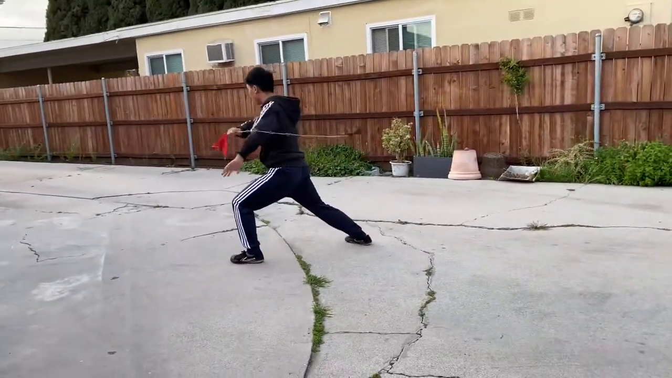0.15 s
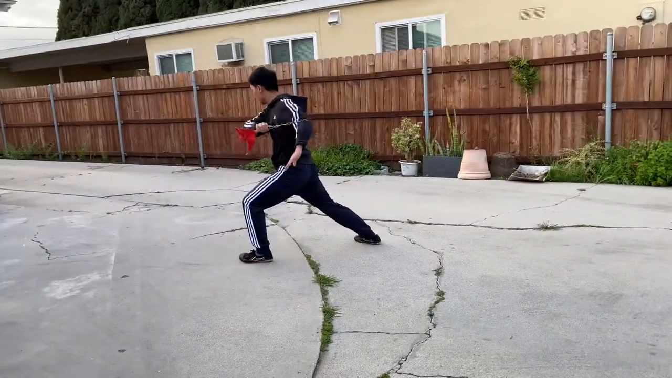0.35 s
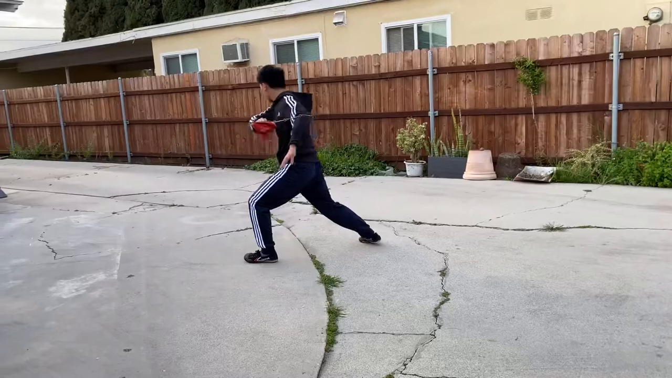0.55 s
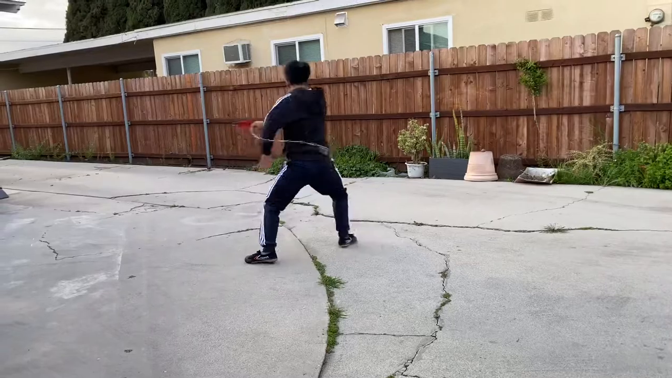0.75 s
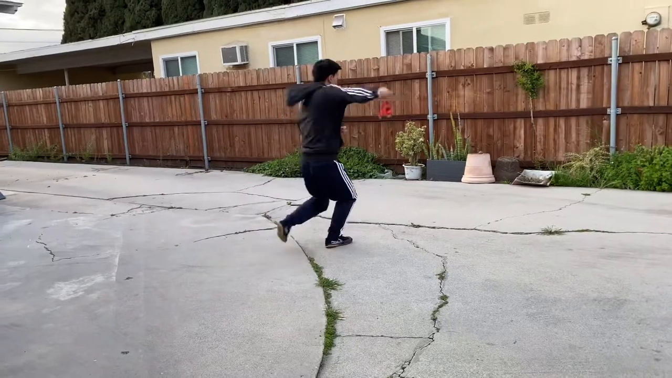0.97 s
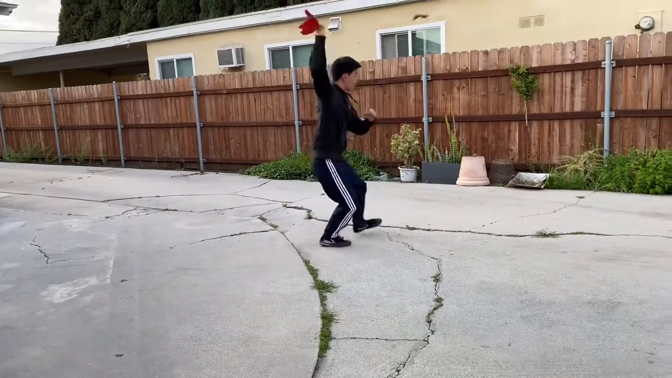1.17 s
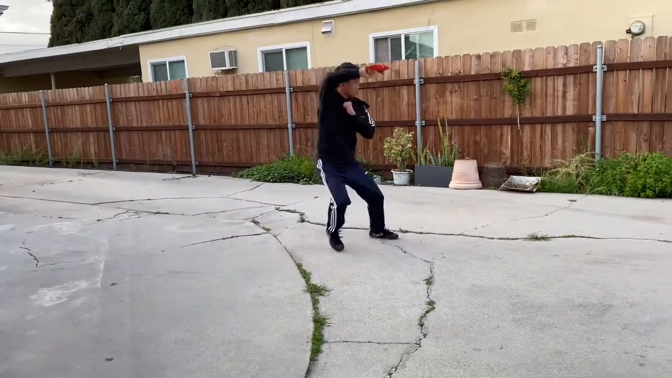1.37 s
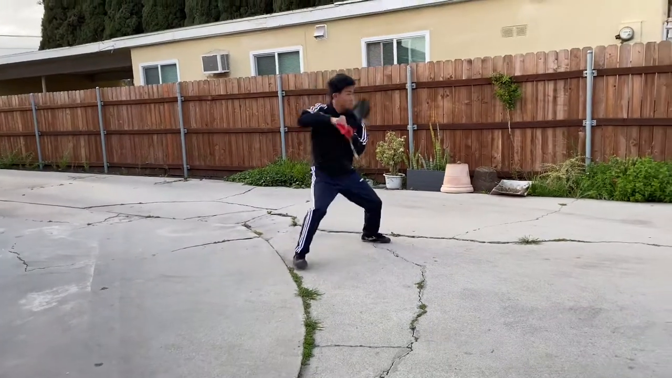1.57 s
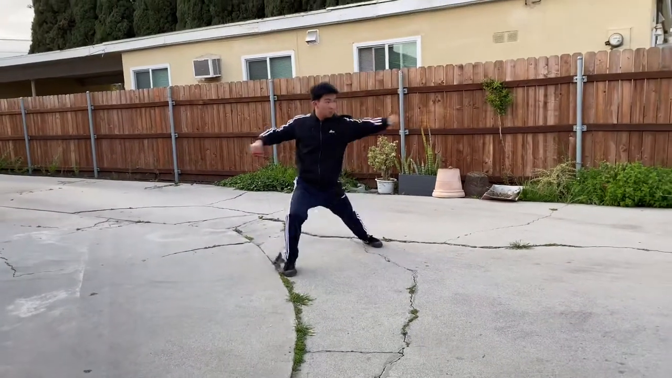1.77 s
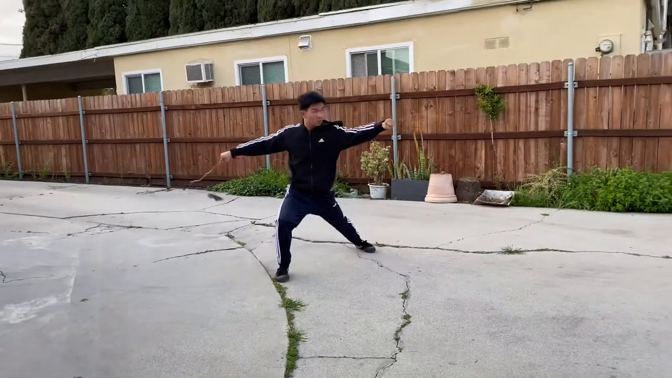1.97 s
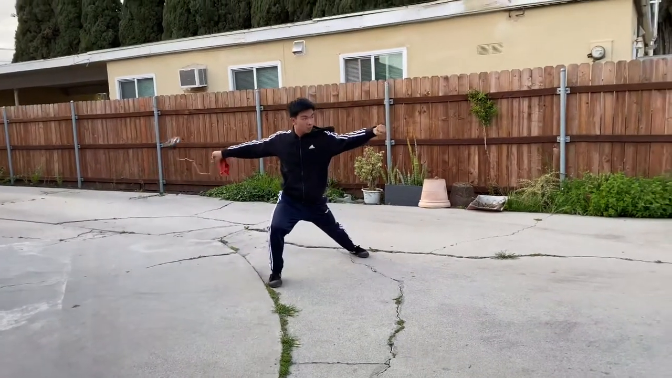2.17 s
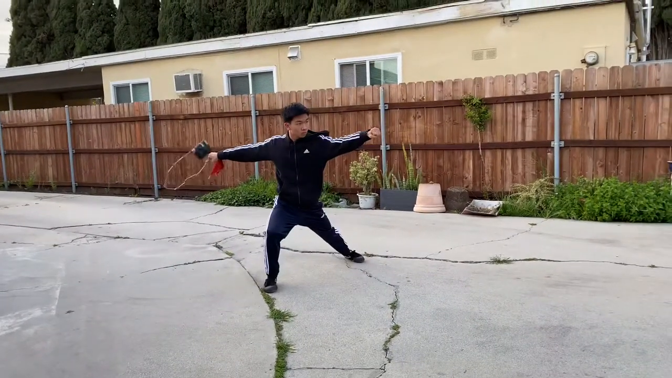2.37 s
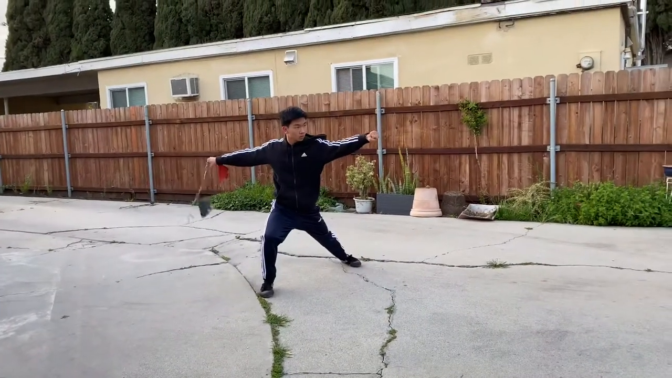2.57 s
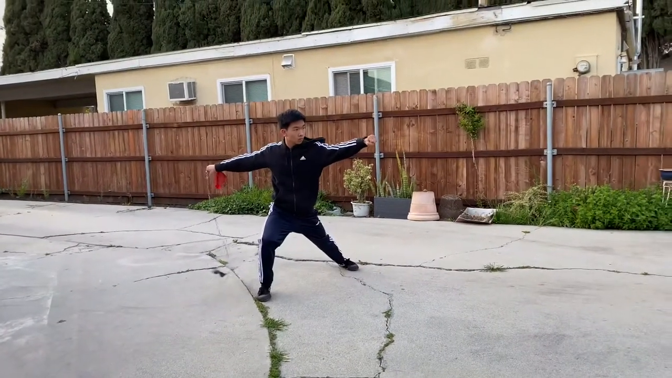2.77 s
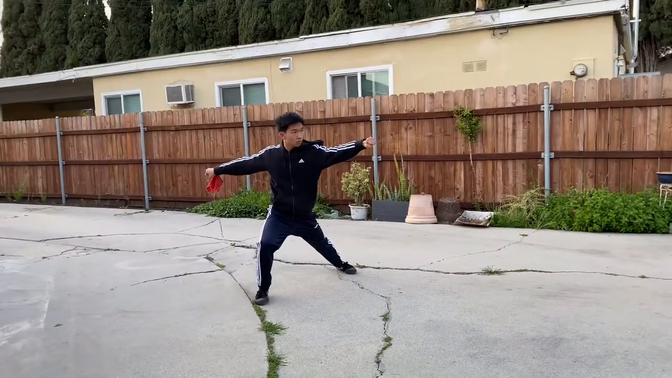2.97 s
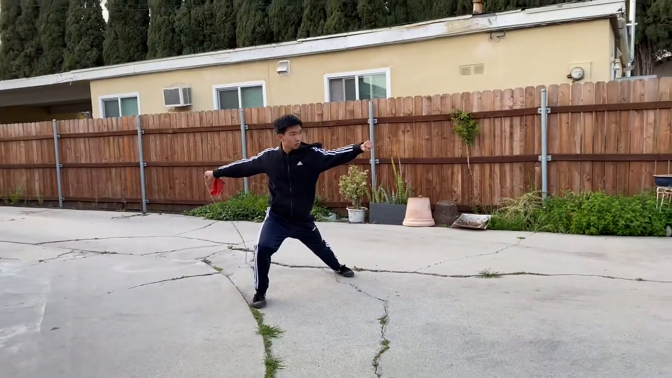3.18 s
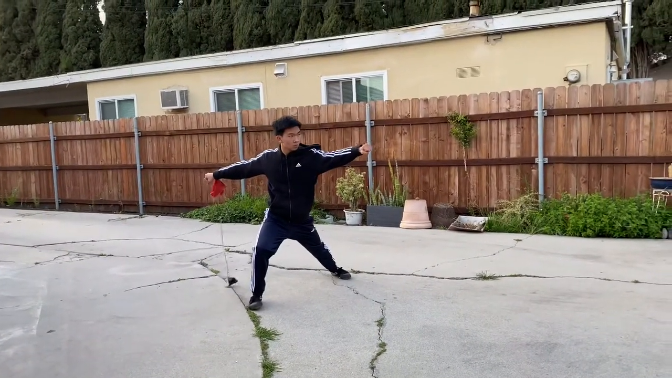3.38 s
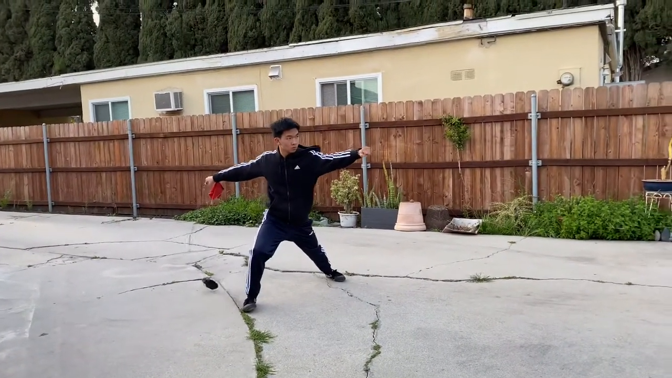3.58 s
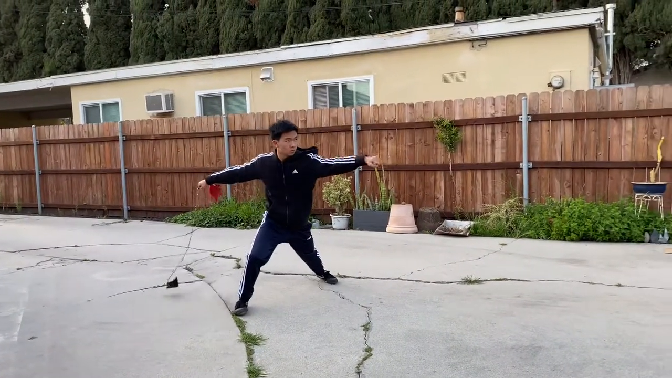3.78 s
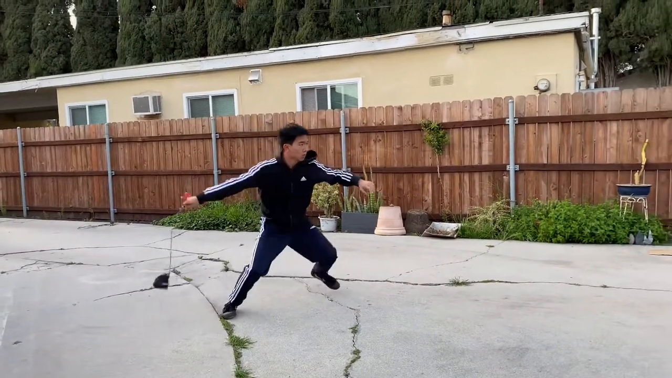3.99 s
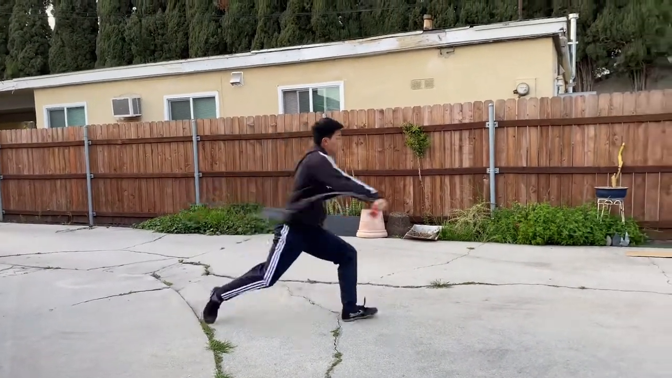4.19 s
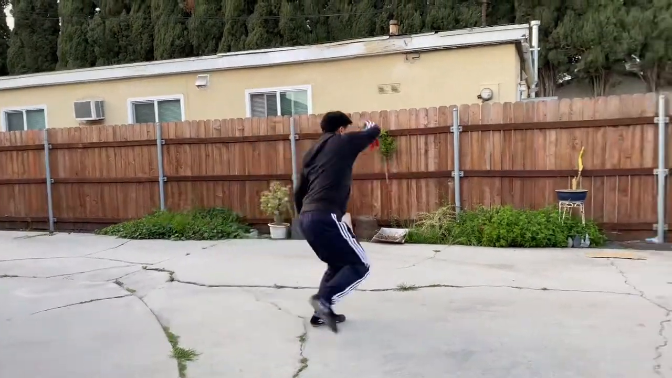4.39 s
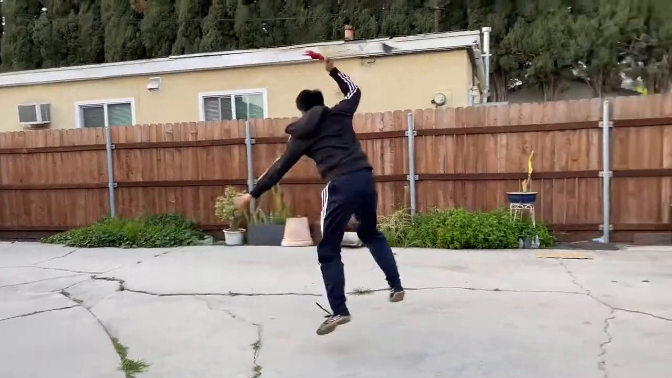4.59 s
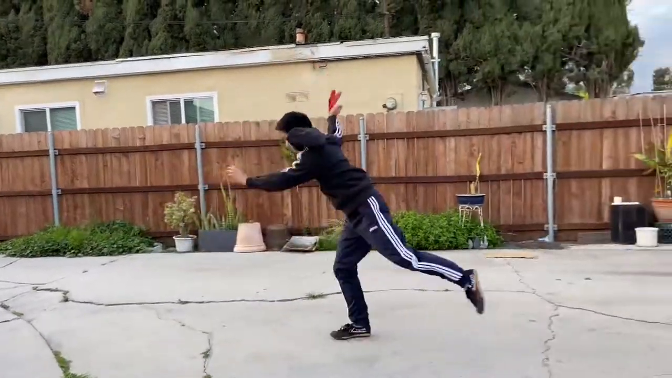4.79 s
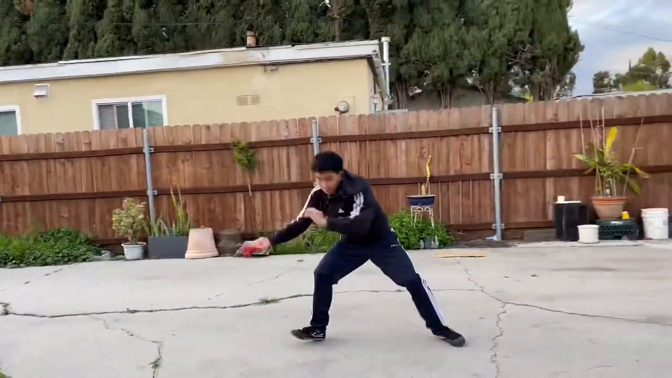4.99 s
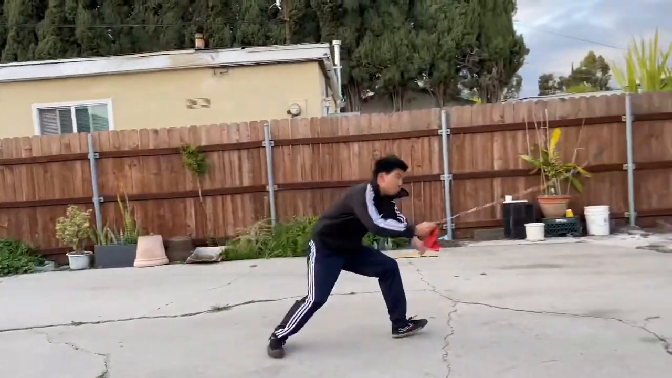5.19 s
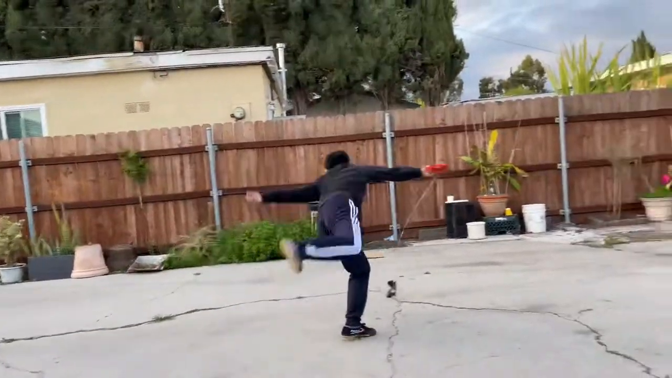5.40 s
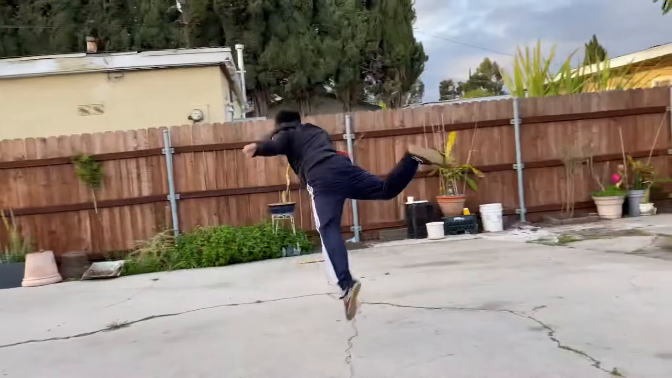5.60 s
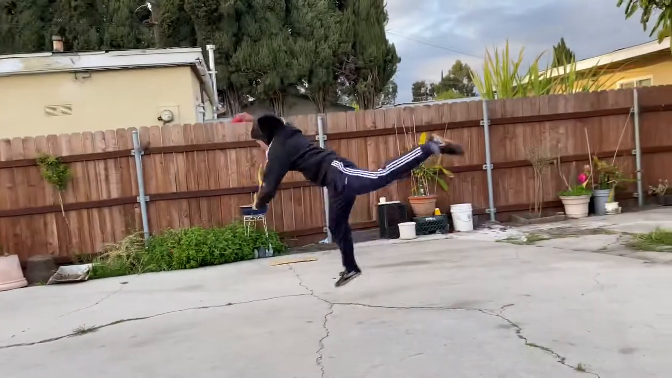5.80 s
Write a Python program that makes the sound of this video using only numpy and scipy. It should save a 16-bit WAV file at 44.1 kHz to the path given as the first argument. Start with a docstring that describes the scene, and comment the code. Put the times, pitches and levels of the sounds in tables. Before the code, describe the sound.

A person works a steel chain whip with a cloth flag outdoors. Shoes and sliding links rasp on concrete, peaking in a heavy crack just before one second. A quieter stretch holds soft jingles and small ticks, with two clear snaps. Then turns and a leap give dense rushes, hard clacks, flapping cloth and low footfalls. A wide stereo pickup catches brief reflections from fence and house over faint distant rumble.

```python
"""A chain whip is swung and spun in a concrete yard with a wooden fence, heard by a microphone pair.
Turns and lunges make gritty rushes of shoes, cloth and chain from coloured grains of noise.
Between them the links jingle as ringing modes and the tip snaps on the ground in short bursts.
The cloth flag swishes and flaps as noise resonances, and heavy steps and gusts thud low down.
A faint distant hum, a thin tone, echoes of ground, fence and house wall, and town rumble lie behind."""
import sys
import numpy as np
from scipy import signal
from scipy.fft import rfft, irfft
from scipy.io import wavfile
from scipy.ndimage import uniform_filter1d

SR = 44100
rng = np.random.default_rng(int(sys.argv[2]) if len(sys.argv) > 2 else 0)


def transcribe(u):
    """Save the signal u as a 16-bit wav file named by the first command-line argument.

    u: samples, shape (n,) or (channels, n), limited to [-1, 1]; the rate is SR.
    q: integer samples, one column per channel.
    """
    v = np.clip(np.atleast_2d(u).T, -1, 1)
    q = np.round(v * 32767).astype(np.int16)
    wavfile.write(sys.argv[1], SR, q)


N = 257970
TIME, HZ = np.arange(N) / SR, np.fft.rfftfreq(N, 1 / SR)

# All event and spectrum levels are relative, ahead of the layer gains in the functions.
# Scuffs of soles, cloth and sliding chain. Each row: start in seconds, rise in seconds,
# hold in seconds, t60 in seconds, level in dB, body and fizz in dB relative to that level.
RUSHES = [(0.0, .002, .005, .3, -51, -7, -5.5), (.1, .02, .12, 0.44, -68.5, -2.5, 4.5),
          (0.334, .025, 0.035, .15, -54.5, 1, -14), (0.446, 0.025, .04, 0.4, -41.5, -6.5, -11),
          (0.661, 0.044, .15, .2, -44.5, -12.5, -3), (0.862, 0.045, 0.056, 0.2, -17.5, -7, -3.5),
          (1.005, .03, .17, .45, -39.5, -2.5, -9.5), (1.615, 0.00515, .085, 0.27, -45, -6, -10),
          (1.68, 0.021, 0.017, .1, -47, -12, -9), (1.722, 0.0064, 0.026, 0.15, -34, -10, 0),
          (4.07, 0.088, .04, 0.3, -49, -5, -5), (4.185, 0.022, 0.023, .16, -24.5, -4.5, -4.5),
          (4.256, .035, .03, 0.48, -22, -5.5, -2), (4.387, 0.0224, .04, .55, -34, -10.5, -17),
          (4.592, 0.017, 0.008, 0.92, -44.5, -13.5, -5.5), (4.936, 0.072, .05, 0.098, -45.5, 6.5, -3.5),
          (5.048, 0.013, .015, 0.28, -33, -3.5, -0.5), (5.113, 0.0081, .015, 0.146, -22, -12.5, -8),
          (5.195, .01, .008, 0.11, -35.5, -4, -5), (5.251, 0.014, .01, 0.12, -34, -11.5, -4),
          (5.3, .01, .02, 0.71, -47.5, -8, -7), (5.478, 0.04, .025, 0.26, -43.5, -5, -6),
          (5.58, 0.065, .09, .1, -47, -18.5, -8.5), (5.703, .008, .03, .3, -36, -3.5, -6),
          (5.744, 0.024, 0.045, 0.8, -35.5, -9, -6.5)]
# Links shaking as the chain slackens in a turn. Each row: start in seconds, rise in seconds,
# hold in seconds, then rattle, high ring and low ring levels in dB.
SHAKES = [(1.894, 0.083, 0.072, -48.5, -45.5, -54), (1.998, .035, .02, -37.5, -71.5, -45),
          (2.297, .015, .02, -73, -65.5, -59), (2.331, 0.046, 0.017, -57.5, -62, -59),
          (2.496, 0.014, 0.063, -57, -55.5, -64), (2.565, .025, 0.031, -73, -46, -82),
          (2.638, 0.039, .03, -49.5, -63.5, -59), (2.712, 0.023, 0.019, -41.5, -72, -49),
          (2.965, .03, .008, -80, -57.5, -85), (3.17, .015, .04, -76.5, -80, -68.5),
          (3.243, .025, 0.047, -67, -56, -69.5), (3.392, 0.022, .04, -55.5, -76, -53.5),
          (3.613, 0.0052, .008, -68, -75, -56.5), (3.765, 0.023, .01, -74, -62, -84),
          (3.843, .015, .04, -68, -81, -71)]
# Steel striking ground or steel. Each row: time in seconds, level in dB,
# body and fizz in dB relative to that level, t60 in seconds.
SNAPS = [(.2985, -54, -12.5, -10, 0.12), (0.386, -40, -35, -21, 0.18), (0.6576, -35, -8, -20, .025),
         (0.677, -33, -15, -24, .016), (0.9067, -9, -9.5, -19.5, 0.078), (1.532, -50.5, 9, -15, 0.08),
         (1.6217, -48.5, -13, -27, .024), (1.727, -20, -18, -37, .05), (2.021, -17, -25, -8.5, 0.057),
         (2.253, -61.5, -29, 3.5, .04), (2.494, -52.5, -15.5, 7.5, 0.024), (2.6065, -59, -14, 12.5, 0.025),
         (2.6716, -39.5, -12, -2, 0.056), (2.712, -20.5, -14, -15.5, 0.045), (3.276, -50, -3, -19, .038),
         (3.4027, -37, -7, -19, 0.11), (3.8634, -51, 0, -28, 0.03), (4.006, -49.5, -0.5, -26.5, 0.05),
         (4.1991, -18.5, -25.5, -16.5, .035), (4.3105, -5, -10, -18.5, 0.022),
         (4.9145, -36, -6.5, -36, 0.089), (5.1223, -19.5, -22, -13, 0.047),
         (5.2046, -21.5, -37, -15.5, 0.069), (5.3538, -32, -28, -15, 0.044),
         (5.7114, -26.5, -14, -12, 0.36)]
# Flaps of the cloth. Each row: time in seconds, level in dB, reference pitch in Hz.
FLAPS = [(4.7348, -31.5, 477), (4.948, -27.5, 626), (4.9821, -27.5, 680), (4.986, -37, 1930),
         (5.297, -33, 336)]
# Swishes and soft puffs of air, cloth and sliding links, with a faint distant low hum at 3.502 s
# and a faint thin tone at 2.397 s.
# Each row: start in seconds, length in seconds, pitch in Hz, width in Hz, level in dB.
SWISHES_AND_TONES = [(0.46, 0.096, 2200, 775, -38.5), (0.686, .17, 565, 483, -42.5),
                     (0.642, .21, 3800, 1200, -45.5), (0.884, .13, 181, 140, -24),
                     (0.931, 0.044, 519, 267, -18.5), (0.902, 0.098, 2080, 1500, -22),
                     (1.241, 0.044, 450, 550, -38.5), (1.745, 0.041, 6120, 710, -38),
                     (2.397, 0.22, 1995, 70, -71.5), (2.704, 0.04, 514, 277, -42.5),
                     (3.502, 0.43, 205, 45, -57), (4.158, 0.045, 635, 706, -42),
                     (4.286, 0.03, 818, 127, -19.5), (4.294, 0.054, 1750, 700, -21.5),
                     (4.299, 0.12, 264, 142, -30.5), (4.394, 0.024, 480, 500, -32),
                     (4.619, 0.018, 3060, 2490, -36), (4.766, 0.02, 2730, 2130, -36.5),
                     (5.059, 0.041, 3140, 700, -37.5), (5.104, 0.078, 255, 140, -37.5),
                     (5.254, .048, 1820, 900, -42.5), (5.723, 0.11, 253, 198, -44.5)]
# Heavy steps and gusts. Each row: start in seconds, rise in seconds, hold in seconds, level in dB.
BUFFETS = [(0.854, 0.092, 0.063, -34.5), (1.218, 0.044, .025, -41.5), (4.173, 0.02, 0.19, -26),
           (4.36, .03, 0.057, -32), (4.879, .02, 0.011, -44), (4.965, 0.037, .02, -29.5),
           (5.1, 0.042, 0.025, -34), (5.71, .035, .1, -35.5)]

# Dull body of scuffs and blows. Each row: frequency in Hz, relative density in dB.
BODY_SPECTRUM = [(65, -25), (110, 2.5), (140, -4.5), (275, -2.5), (314, -4), (594, -1.5), (648, -3.5),
                 (793, -9), (961, -27), (1100, -26), (1430, -14), (2420, -120)]
# Grit under the soles. Each row: frequency in Hz, relative density in dB.
GRIT_SPECTRUM = [(500, -37.5), (850, -8.5), (1070, -5.5), (1130, -5.5), (1570, -4.5), (1910, -2),
                 (2620, -4), (3210, -3), (3910, -3.5), (4230, -1), (5950, -8), (6690, -6), (8800, -17.5),
                 (11400, -37), (19400, -120)]
# Crack of struck steel. Each row: frequency in Hz, relative density in dB.
STEEL_SPECTRUM = [(500, -21), (850, -10.5), (1840, 0), (2210, 0.5), (2590, 1.5), (2810, -9), (3420, 5),
                  (4930, 0), (6120, -7.5), (9000, -1.5), (11700, -58.5), (19800, -120)]
# Fine fizz on top. Each row: frequency in Hz, relative density in dB.
FIZZ_SPECTRUM = [(7500, -17.5), (9000, -7.5), (10000, 0.5), (12000, 2), (14500, -3), (16000, -0.5)]
# Loose rattle of links. Each row: frequency in Hz, relative density in dB.
RATTLE_SPECTRUM = [(500, -4.0), (2000, -3), (5500, 1.5), (6800, 1.5),
                   (8000, -2.5), (9300, -5), (12000, -3), (16000, -6)]
# Thud of weight and moving air. Each row: frequency in Hz, relative density in dB.
THUD_SPECTRUM = [(20, -34.5), (35, -16.5), (55, 0), (75, 9),
                 (120, -5.5), (180, -10), (350, -39.5), (900, -73.5)]
# Distant town rumble. Each row: frequency in Hz, relative density in dB.
AIR_SPECTRUM = [(12, -52.5), (20, -20.5), (40, -2.5), (70, 4.5), (146, -7), (204, -11.5), (262, -13.5),
                (1060, -23.5), (2750, -37.5), (3340, -34.5), (4670, -41), (10500, -56.5), (13200, -48),
                (14300, -52), (16000, -47)]

# High modes of a link. Each row: frequency in Hz, relative level in dB, t60 in seconds.
LINK_HIGH_MODES = [(14080, -1, .12), (14270, 12, 0.11), (13670, 11, .03), (15500, -12, 0.034),
                   (9100, -4, 0.15), (8900, -18, 0.023), (7000, -4, 0.041), (6470, -4.5, 0.068)]
# Low modes of a link. Each row: frequency in Hz, relative level in dB, t60 in seconds.
LINK_LOW_MODES = [(3342, -2, 0.05), (3300, 4, 0.031), (3660, -10, .012)]
# Ring of struck tip and links. Each row: frequency in Hz, relative level in dB, t60 in seconds.
TIP_MODES = [(3620, -15, .012), (8870, 4, 0.026), (13500, 2.5, 0.015), (15500, -5, .012)]

# First echoes off the ground and the fence. Each row: delay in seconds, level in dB.
ECHOES = [(.0035, -18.5), (0.0214, -17.5), (0.0332, -15)]
# Decay of the yard. Each row: frequency in Hz, t60 in seconds.
YARD_DECAY = [(150, 0.66), (1000, 0.31), (4000, 0.39), (8000, 0.18), (15000, 0.38)]
# Likeness of the two microphone ports for movement. Each row: frequency in Hz, likeness from 0 to 1.
MOVE_LIKENESS = [(95, 1), (130, .7), (290, .8), (640, .4), (1400, .5), (3100, .2), (7000, .4), (9000, .7),
                 (10500, .93), (16000, .97)]
# The same for blows. Each row: frequency in Hz, likeness from 0 to 1.
HIT_LIKENESS = [(100, 0.3), (1500, 0.068), (8000, 0.61), (15000, .6)]
# The same for the open air. Each row: frequency in Hz, likeness from 0 to 1.
AIR_LIKENESS = [(60, 1), (130, .8), (290, 0.13), (640, 0.048), (3000, 0.091), (15000, .4)]
# Phase between the ports. Each row: frequency in Hz, angle subtracted from the right in radians.
PORT_PHASE = [(0, 0), (1100, 0), (2000, -.7), (3500, -2), (5100, -3.4), (6300, -6.2), (7200, -6.3),
              (8400, -8.8), (9300, -9.5), (10300, -12.57), (11600, -12.57), (12500, -15.7), (13600, -15.7),
              (14700, -18.85)]
# Balance of the ports. Each row: frequency in Hz, left minus right in dB.
PORT_TILT = [(60, -0.5), (110, -0.5), (200, 0.0), (380, -0.85), (700, 1.5), (1290, -0.91), (2380, 2.3),
             (4400, 2), (8120, 0.5), (15000, 0.0)]

SWELL_POWER, SAG_DB_PER_S = 1.2, 2.5  # gain grows as this power of time; slope during the hold
SHAKE_T60_S, BUFFET_T60_S = 0.23, 0.24
SPIN_START_S, SPIN_END_S = 1.9, 4.1  # the spinning chain never quite rests in this span
SPIN_RATTLE_DB, SPIN_HIGH_DB = -75, -82  # ahead of the layer gains
EDGE_HZ = 15950  # upper band limit


def rushes():
    """Grit under the soles and sliding links: dense collisions with a dull body and a fine fizz."""
    grit, body, fizz = np.zeros((3, N))
    for start, rise, hold, t60, db, body_db, fizz_db in RUSHES:
        push = amp(db) * stroke(start, rise, hold, t60)
        grit += push
        body += push * amp(body_db)
        fizz += push * amp(fizz_db)
    drive = grains(per_s=3500, spread_db=2.0, smooth=0.63) * flutter(depth_db=1.04, size=260)
    drive = patchy(drive, depth_db=3.0, bins=5, frames=10)
    return (amp(-0.5) * colour(drive * grit, GRIT_SPECTRUM)
            + amp(-2.0) * colour(drive * body, BODY_SPECTRUM)
            + amp(-3.0) * colour(drive * fizz, FIZZ_SPECTRUM))


def jingle():
    """The spinning chain rattles and rings faintly, and louder at each shake, in little clumps."""
    spinning = 1. * (TIME > SPIN_START_S) * (TIME < SPIN_END_S)
    spinning = uniform_filter1d(spinning, size=2000)  # soft ends
    gains = np.outer([amp(SPIN_RATTLE_DB), amp(SPIN_HIGH_DB), 0], spinning)
    for start, rise, hold, rattle_db, high_db, low_db in SHAKES:
        shake = stroke(start, rise, hold, SHAKE_T60_S)
        gains += np.outer(amp([rattle_db, high_db, low_db]), shake)
    rattle_gain, high_gain, low_gain = gains
    clinks = patchy(grains(per_s=2000, spread_db=3, smooth=.6), depth_db=2, bins=4, frames=12)
    rattle = colour(clinks, RATTLE_SPECTRUM)
    high = ring(LINK_HIGH_MODES, per_s=170)
    clumps = flutter(depth_db=4, size=600)
    low = clumps * ring(LINK_LOW_MODES, per_s=200)
    return (amp(-4.5) * rattle * rattle_gain + amp(-5.0) * high * high_gain
            + amp(-3.5) * low * low_gain)


def ring(modes, per_s):
    """Links knock together at random and ring."""
    return struck(grains(per_s, spread_db=2.5, smooth=.2), modes)


def struck(blows, modes):
    """Blows ring a set of steel modes, each a decaying sine."""
    t = np.arange(SR // 5) / SR
    link = sum(amp(db - 60 * t / t60) * np.sin(2 * np.pi * hz * t) for hz, db, t60 in modes)
    return signal.oaconvolve(blows, link[None] / np.linalg.norm(link), axes=1)[:, :N]


def snaps():
    """Each blow is a sharp crack and a quick run of links landing one after another."""
    steel, body, fizz = np.zeros((3, 2, N))
    t = np.arange(SR // 6) / SR
    links = grains(per_s=7000, spread_db=2.5, smooth=.9)
    attack = (1 - np.exp(-t / .0003)) * (1 + .6 * np.exp(-t / .002))
    for s, db, body_db, fizz_db, t60 in SNAPS:
        landing = np.roll(links, -round(s * SR), axis=1)[:, :len(t)]
        burst = landing * attack * amp(db - 60 * t / t60)
        add(steel, s, burst)
        add(body, s, burst * amp(body_db))
        add(fizz, s, burst * amp(fizz_db))
    return (amp(-10.5) * colour(steel, STEEL_SPECTRUM) + amp(-5.5) * colour(body, BODY_SPECTRUM)
            + amp(1.0) * colour(fizz, FIZZ_SPECTRUM) + amp(-1.5) * struck(fizz, TIP_MODES))


def flaps(fall_s=0.00426, t60=0.095, clean=0.47, spread=0.81):
    """The cloth pulls taut: a rough snap whose pitch drops steeply as the fold slows."""
    out, t = np.zeros((2, N)), np.arange(SR // 8) / SR
    for s, db, hz in FLAPS:
        glide = hz * (0.427 + 1.29 / (1 + t / fall_s))  # from 1.717 times the reference toward 0.427
        width = spread * hz
        fold = np.sin(2 * np.pi * np.cumsum(glide) / SR)
        noise = rng.standard_normal((2, len(t)))
        puff = unit(resonate(resonate(noise, glide, width), glide, width))
        add(out, s, (clean * fold + puff) * amp(db - 60 * t / t60))
    return out


def swishes_and_tones():
    """Noise through one soft resonance that swells and fades: swishes, puffs, a faint hum and a thin tone."""
    out = np.zeros((2, N))
    for s, length, hz, width, db in SWISHES_AND_TONES:
        progress = np.linspace(0, 1, round(length * SR))
        noise = rng.standard_normal((2, len(progress)))
        resonance = unit(resonate(resonate(noise, hz, width), hz, width))
        add(out, s, amp(db) * np.sin(np.pi * progress ** 0.64) * resonance)
    return out


def buffets():
    """Low, lumpy thuds of weight and moving air."""
    rumble = colour(rng.standard_normal((2, N)), THUD_SPECTRUM)
    push = sum(amp(db) * stroke(start, rise, hold, BUFFET_T60_S) for start, rise, hold, db in BUFFETS)
    return amp(-1.5) * rumble * push


def bounce(x):
    """Adds the first distinct echoes off ground and fence as delayed copies."""
    out = x.copy()
    for delay_s, db in ECHOES:
        add(out, delay_s, amp(db) * x)
    return out


def yard(x, delay_s=0.012):
    """Fence and house wall scatter the sound back, each frequency dying at its own rate."""
    t = np.arange(SR) / SR
    build_up = np.clip(t / delay_s - 1, 0, 1)  # silent for one delay, full after two
    reflected = rng.random((2, SR)) < 3000 / SR
    taps = rng.choice([-1., 1.], (2, SR)) * reflected * build_up
    hz, when, z = signal.stft(taps, SR, nperseg=256)
    decay = amp(-60 * when / read(YARD_DECAY, hz)[:, None])
    tail = signal.istft(z * decay, SR, nperseg=256)[1]
    return signal.fftconvolve(x, tail / np.linalg.norm(tail[0]), axes=1)[:, :N]


def air():
    """Distant town rumble: coloured noise, wide across the pair, with a slight slow wobble."""
    rumble = colour(rng.standard_normal((2, N)), AIR_SPECTRUM)
    return amp(-52) * pair(rumble, AIR_LIKENESS) * flutter(depth_db=0.53, size=4000)


def pair(x, likeness):
    """Blends two unrelated signals into what the two microphone ports hear."""
    a, b = rfft(x)
    same = np.clip(read(likeness, HZ), 0, .999)
    right = same * a + np.sqrt(1 - same ** 2) * b
    right = right * np.exp(-1j * read(PORT_PHASE, HZ))
    lean = amp(read(PORT_TILT, HZ) / 2)
    return irfft(np.array([a * lean, right / lean]), N)


def stroke(start, rise, hold, t60):
    """Gain of one movement: it swells, holds with a slight sag, and dies away."""
    t = np.maximum(TIME - start, 0)
    sag_db = SAG_DB_PER_S * np.clip(t - rise, 0, hold)
    fall_db = sag_db + 60 * np.maximum(t - rise - hold, 0) / t60
    return np.minimum(t / rise, 1) ** SWELL_POWER * amp(-np.minimum(fall_db, 150))


def grains(per_s, spread_db, smooth):
    """Two trains of tiny collisions of uneven size, at shared moments, over a smooth hiss."""
    struck_now = rng.random(N) < per_s / SR
    size = amp(spread_db * np.minimum(rng.exponential(1, N), 4)) * struck_now
    hits = unit(size * rng.choice([-1., 1.], (2, N)))
    return unit(hits + smooth * rng.standard_normal((2, N)))


def flutter(depth_db, size):
    """Random wobble of gain, smoothed twice over size samples."""
    wobble = uniform_filter1d(uniform_filter1d(rng.standard_normal(N), size), size)
    return unit(amp(depth_db * unit(wobble)))


def patchy(x, depth_db, bins, frames):
    """The colour shifts from moment to moment as the contact changes."""
    z = signal.stft(x, nperseg=512, noverlap=384)[2]
    field = uniform_filter1d(rng.standard_normal(z.shape[1:]), bins, 0)
    field = uniform_filter1d(field, frames, 1)
    shifted = z * amp(depth_db * unit(field))
    return unit(signal.istft(shifted, nperseg=512, noverlap=384)[1][:, :N])


def resonate(x, hz, width):
    """A resonance of gain 1 that follows the curve hz: shift to zero, low-pass, shift back."""
    turn = np.exp(2j * np.pi * np.cumsum(hz * np.ones(x.shape[-1])) / SR)
    r = np.exp(-np.pi * width / SR)
    return 2 * (turn * signal.lfilter([1 - r], [1, -r], x / turn + 1e-18)).real


def colour(x, spectrum):
    """Filters by a spectrum, keeping the power of white input."""
    return irfft(rfft(x) * unit(amp(read(spectrum, HZ))), N)


def read(points, hz):
    """Reads a curve on a log-frequency axis."""
    f, value = np.transpose(points)
    return np.interp(np.log(hz + 1), np.log(f + 1), value)


def amp(db):
    """Decibels to gain."""
    return 10 ** (np.asarray(db) / 20)


def unit(x):
    """Scales to rms 1."""
    return x / np.sqrt(np.mean(x ** 2) + 1e-20)


def add(mix, s, sound):
    """Mixes a sound in at s seconds, cut at the end of the mix."""
    part = mix[:, round(s * SR):][:, :sound.shape[-1]]
    part += sound[..., :part.shape[-1]]


def scene():
    """Movement, chain, hum and tone, their echo, and the open air."""
    moves = rushes() + swishes_and_tones() + flaps() + jingle()
    hits = bounce(snaps())
    echo = yard(amp(-13.5) * moves + amp(-7.0) * hits)
    return pair(moves + buffets() + echo, MOVE_LIKENESS) + pair(hits, HIT_LIKENESS) + air()


def record(dry):
    """The loudest peaks are rounded off; then the band limit."""
    rounded = dry / (1 + (dry / .85) ** 4) ** .25
    low_pass = signal.firwin(511, EDGE_HZ, window=("kaiser", 9), fs=SR)
    return signal.oaconvolve(rounded, low_pass[None], "same")


dry = scene()
out = record(dry)
transcribe(out)
```